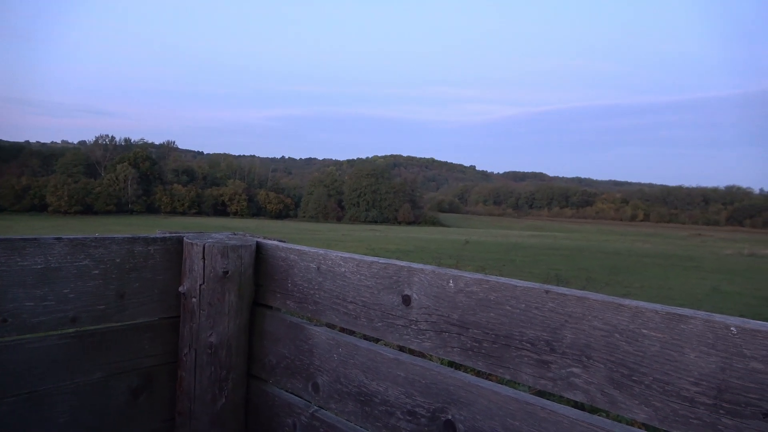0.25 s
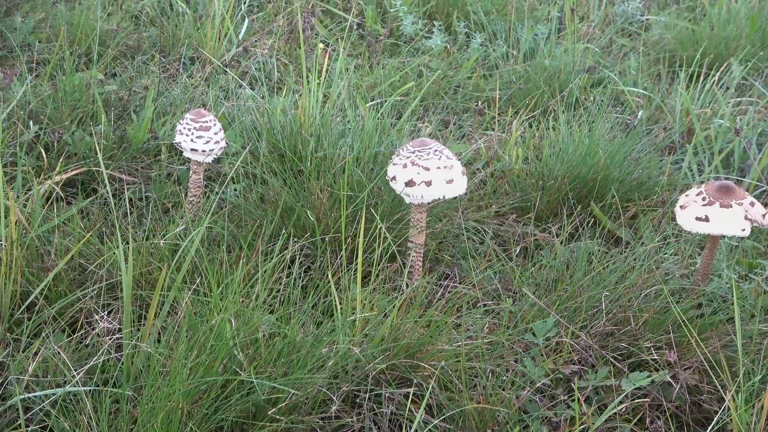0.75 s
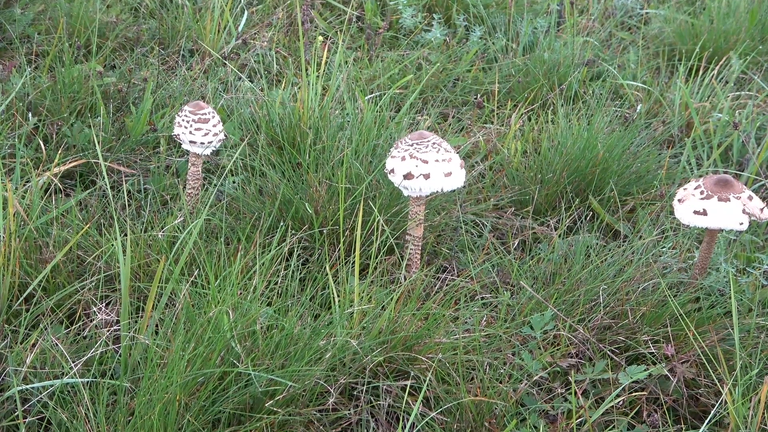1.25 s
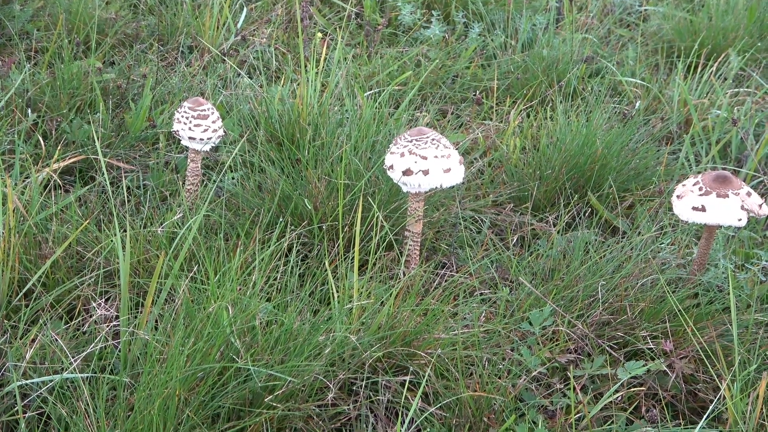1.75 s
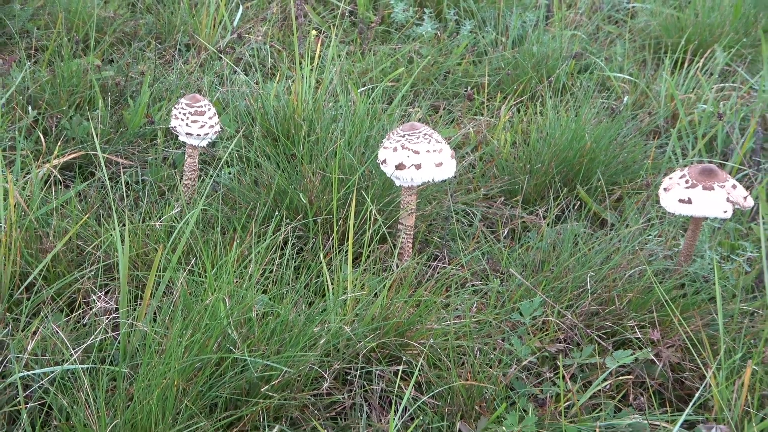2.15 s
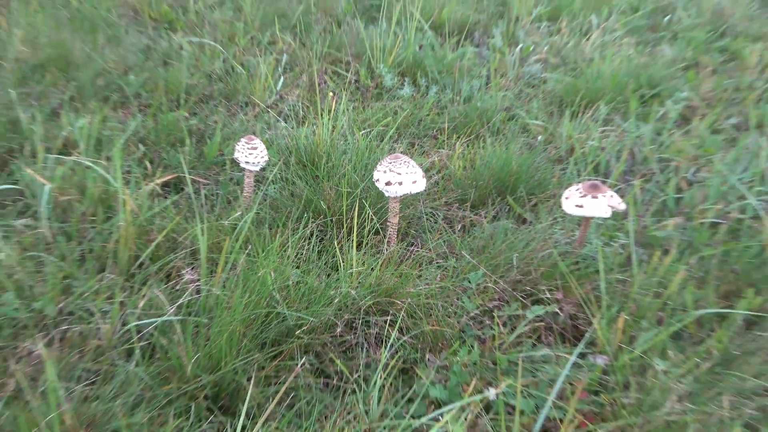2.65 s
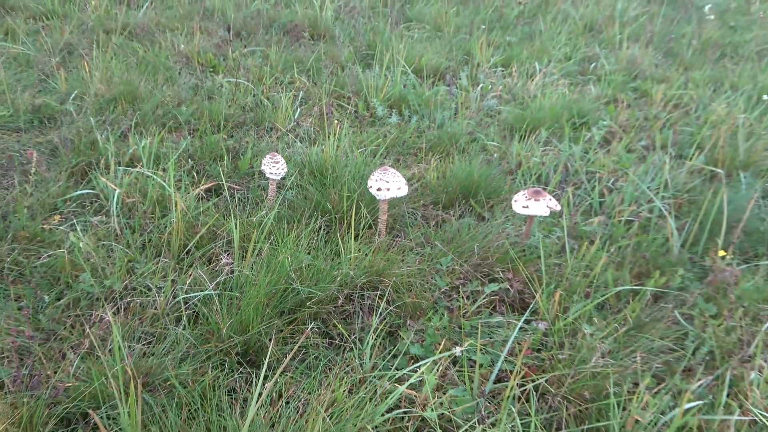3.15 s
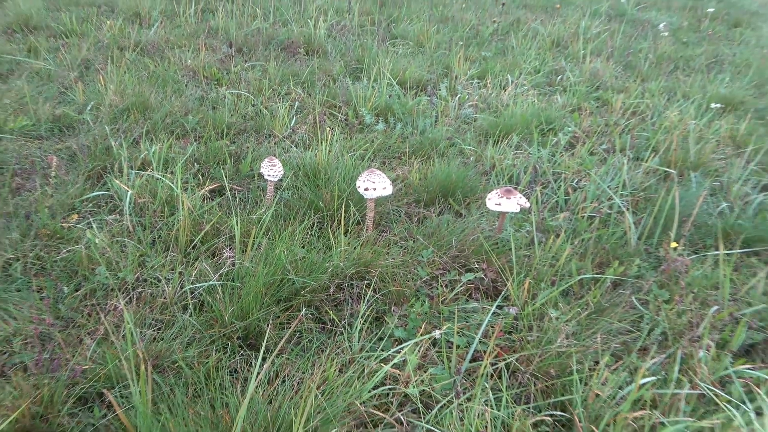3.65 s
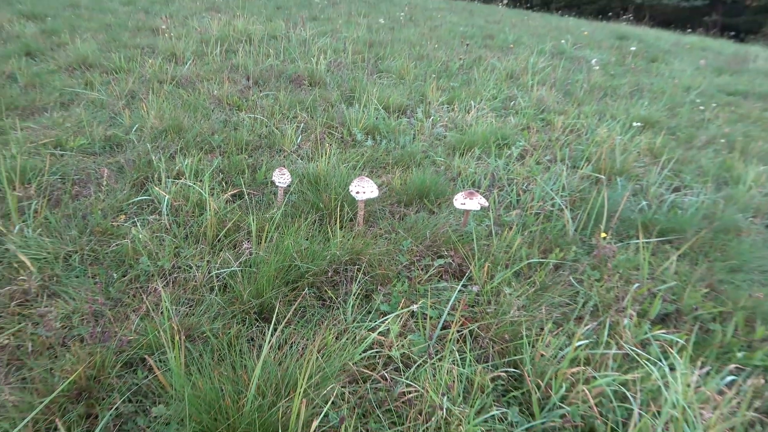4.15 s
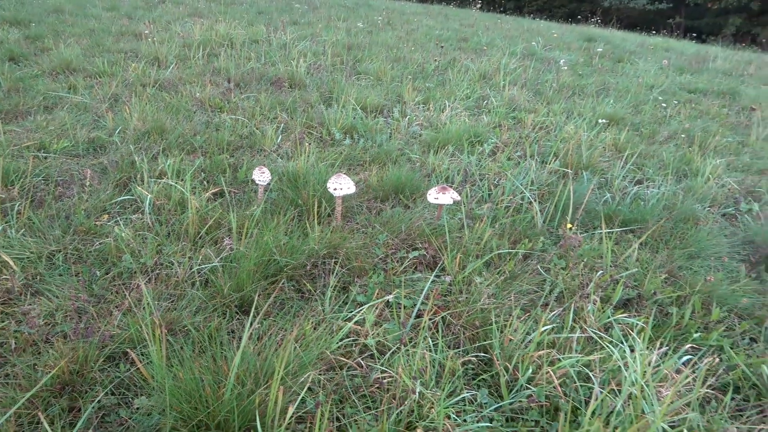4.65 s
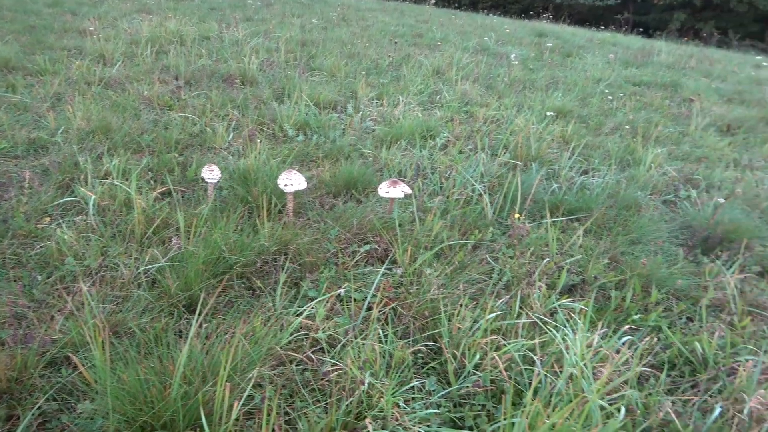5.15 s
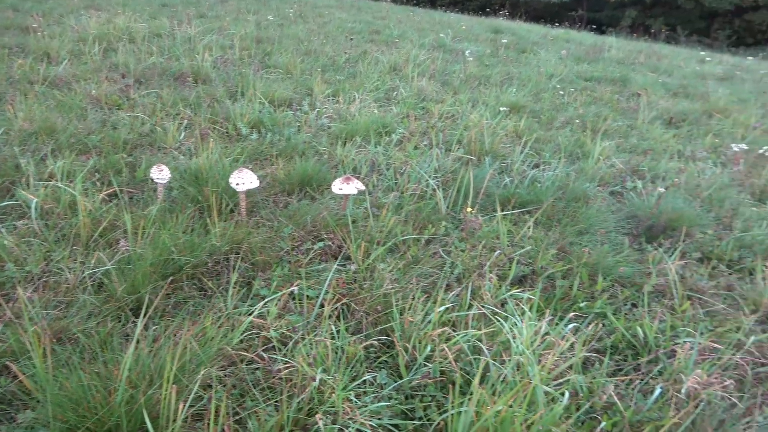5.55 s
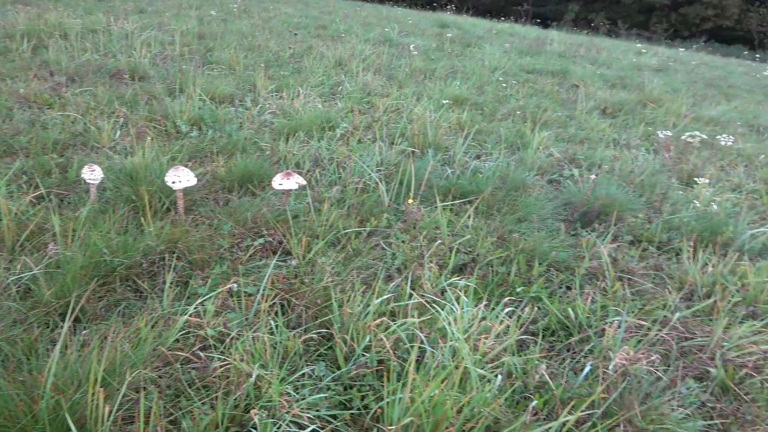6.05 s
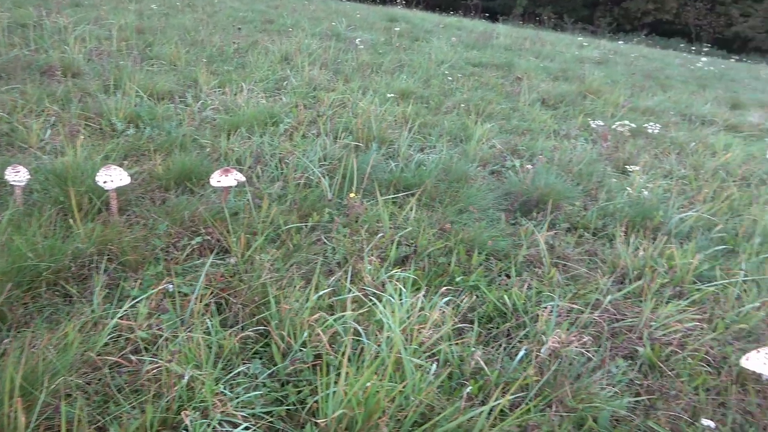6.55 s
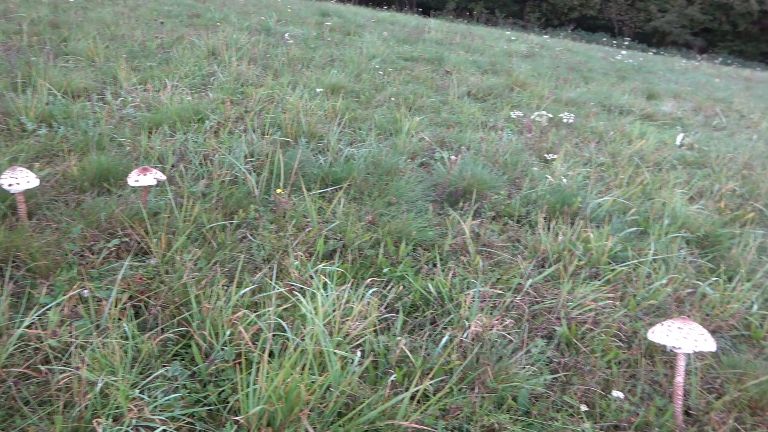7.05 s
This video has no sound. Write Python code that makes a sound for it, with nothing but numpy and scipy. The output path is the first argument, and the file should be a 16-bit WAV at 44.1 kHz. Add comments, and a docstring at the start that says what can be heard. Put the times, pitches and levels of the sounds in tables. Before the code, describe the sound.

Deep, burping, pulsed buck groans repeat about once a second, echoing softly off a wood edge above a quiet hissing grassland.

```python
"""A rutting buck's groans across a meadow: the end of one, then nine more. Fold pulses, roughly 18-36
a second, ring the resonances of a long throat; a thin hiss follows the open mouth.
The wood edge answers with a decaying noise tail; a low murmur, air hiss and a thin insect tone lie underneath.
One mix widened to stereo: the left channel is the right delayed, filtered and partly phase-scrambled."""
import sys
import numpy as np
from scipy import signal
from scipy.fft import rfft, irfft, next_fast_len
from scipy.io import wavfile
from scipy.ndimage import uniform_filter1d, map_coordinates

SR = 44100
rng = np.random.default_rng(int(sys.argv[2]) if len(sys.argv) > 2 else 0)


def to_wav(sig):
    """Store sig (one row per channel, or 1-D mono) as 16-bit WAV at the path in sys.argv[1].

    Samples outside -1..1 are clipped; the rate is SR.
    """
    pcm = np.clip(np.atleast_2d(sig), -1, 1) * 32767
    pcm = np.round(pcm).astype(np.int16)
    wavfile.write(sys.argv[1], SR, pcm.T)  # frames by channels


N = 321930

# vocal fold rhythm, one list a groan: time_s, pulses_since_groan_began
FOLD_RHYTHM = [
    [(-.03, 0), (.004, 1), (.075, 3)],
    [(.32, 0), (.402, 2), (.497, 5), (.66, 10), (.77, 13), (.865, 16)],
    [(1.182, 0), (1.325, 3), (1.371, 4), (1.502, 8), (1.537, 9), (1.71, 13)],
    [(2.172, 0), (2.227, 1), (2.323, 3), (2.451, 6), (2.496, 7), (2.65, 10)],
    [(3.032, 0), (3.135, 2), (3.221, 4), (3.282, 6), (3.346, 8), (3.414, 10), (3.487, 12), (3.641, 15)],
    [(4.047, 0), (4.271, 4), (4.423, 7), (4.504, 9), (4.572, 11), (4.682, 14), (4.725, 15), (4.78, 16),
     (4.9, 19)],
    [(5.045, 0), (5.09, 1), (5.191, 4), (5.328, 9), (5.412, 11)],
    [(5.705, 0), (5.737, 1), (5.795, 3), (5.828, 4), (5.964, 7), (6.017, 9), (6.17, 13)],
    [(6.23, 0), (6.356, 3), (6.421, 5), (6.515, 8), (6.602, 11), (6.775, 15)],
    [(6.952, 0), (7.045, 2), (7.12, 4), (7.227, 7), (7.32, 10)],
]
# drive of the three independent tract parts: time_s, chest_db, throat_db, mouth_db
GROAN_LEVELS = [(0, -39, -56, -53), (0.04, -60, -58.5, -71), (0.32, -43.5, -47.5, -60),
                (0.362, -41, -41, -46), (0.403, -42.5, -34.5, -42.5), (0.465, -41, -41, -37),
                (0.562, -43.5, -37.5, -35), (0.66, -45, -41.5, -37.5), (0.77, -43.5, -50, -49),
                (0.865, -51, -56.5, -59.5), (1.182, -54, -49, -64), (1.229, -45.5, -46, -47),
                (1.277, -45, -39, -40.5), (1.324, -41, -39, -43), (1.404, -35, -33.5, -37.5),
                (1.502, -39.5, -47.5, -38.5), (1.58, -46.5, -46, -47.5), (1.71, -46, -60.5, -77),
                (2.172, -57, -51.0, -55.5), (2.227, -44.0, -41, -54.5), (2.323, -42, -35, -41.5),
                (2.41, -35, -34, -43), (2.497, -48, -35, -43), (2.549, -37, -52, -49),
                (2.65, -54, -64, -66), (3.032, -48.5, -55.5, -65), (3.083, -48, -50.5, -46.5),
                (3.178, -40, -36.5, -36.5), (3.282, -37, -37, -39.5), (3.38, -39.5, -39, -35),
                (3.487, -43, -43.5, -42), (3.538, -49, -55, -60), (3.641, -55, -53, -57.5),
                (4.047, -44, -53.0, -72), (4.159, -40, -50, -59.5), (4.271, -49, -38, -61),
                (4.374, -55, -41, -58), (4.425, -44.5, -35.5, -45.5), (4.538, -36, -37, -38.5),
                (4.645, -43.5, -40, -42.5), (4.731, -43, -54.5, -46.5), (4.78, -40.0, -51.5, -54.5),
                (4.9, -48.5, -60, -69), (5.045, -49, -47.0, -60.5), (5.09, -41, -33.5, -45),
                (5.158, -41, -38.5, -37), (5.246, -38.5, -41.5, -35.5), (5.328, -42.5, -44.5, -47.0),
                (5.412, -65, -59, -61), (5.705, -54, -41.5, -51), (5.737, -34.5, -34, -39),
                (5.795, -35, -42, -32.5), (5.873, -37, -42.5, -36), (5.964, -37, -41.5, -45),
                (6.055, -42, -47.5, -54.5), (6.17, -57, -50.5, -56.5), (6.23, -57, -57, -70),
                (6.314, -49.5, -45.5, -53), (6.356, -37.5, -35, -44.5), (6.421, -39.5, -37, -33),
                (6.515, -33.5, -38, -32), (6.602, -38.5, -45, -39.5), (6.689, -44.5, -48.5, -47),
                (6.775, -52, -52, -60.5), (6.952, -47.5, -58, -63), (6.998, -50, -43.5, -46),
                (7.045, -39.5, -34, -42), (7.156, -32.5, -39.0, -34.5), (7.227, -43, -38.0, -35.0),
                (7.289, -40, -30.5, -35.5)]
# colour of each groan: turbulent_share (0-1, before each part's weight),
# then offsets from the usual voice: pharynx_db, nose_db, lips_db, rasp_db
GROAN_COLOUR = [(0.9, 1, 1.5, -0.5, -2), (0.86, 2, -2, 1.5, 1), (0.54, -0.5, -2, 0.5, -0.5),
                (0.4, 2, 0.5, 0.5, 1), (0.32, 1, -0.5, 0, -2), (0.44, -4.5, -2.5, 1, 4),
                (1, -2.5, -5.5, -0.5, 3.5), (0.9, 2, -3, -4, 1.5), (0.96, 1.5, -2.5, -2, -2),
                (1, 0.5, 2, 1, -1.5)]


def amp(db):
    """dB to gain."""
    return 10 ** (np.asarray(db) / 20)


def unit(x):
    """Scale to rms 1."""
    return x / np.sqrt(np.mean(x ** 2) + 1e-20)


def along(points, hz):
    """Interpolate (Hz, value) points on a log frequency axis."""
    f, v = np.transpose(points)
    return np.interp(np.log(hz + 1), np.log(f + 1), v)


def wobble(rate_hz):
    """Smooth random curve with rate_hz knots a second."""
    knots = rng.standard_normal(int(N * rate_hz / SR) + 4)
    return map_coordinates(knots, [np.arange(N) * rate_hz / SR])


def filtered(x, response):
    """Multiply the spectrum of x by a complex response of frequency."""
    m = next_fast_len(N + SR // 2)
    return irfft(rfft(x, m) * response(np.fft.rfftfreq(m, 1 / SR)), m)[..., :N]


def rush(spectrum, patchy_db):
    """Coloured noise of rms 1 with time-frequency patches of random gain."""
    z = signal.stft(rng.standard_normal(N), nperseg=512)[2]
    field = uniform_filter1d(rng.standard_normal(z.shape), size=6, axis=0)
    field = uniform_filter1d(field, size=12, axis=1)
    x = signal.istft(z * amp(patchy_db * unit(field)), nperseg=512)[1][:N]
    return unit(filtered(x, lambda hz: amp(along(spectrum, hz))))


def posture():
    """Times and levels of all tract parts: three move freely, the others follow them."""
    full_db = -40  # throat or mouth level of a full groan
    nose_lag_s = .035  # the nose opens and closes later than the mouth
    s, chest, throat, mouth = np.transpose(GROAN_LEVELS)
    groan_ends_s = [rows[-1][0] + .02 for rows in FOLD_RHYTHM]
    groan = np.searchsorted(groan_ends_s, s)
    _, pharynx_db, nose_db, lips_db, rasp_db = np.array(GROAN_COLOUR)[groan].T

    # level at a full groan, plus dB gained per dB of the leading part, plus the groan's colour
    late_mouth = np.interp(s - nose_lag_s, s, mouth)
    pharynx = -52.5 + .64 * (throat - full_db) + .32 * (mouth - full_db) + pharynx_db
    nose = -45 + .62 * (late_mouth - full_db) + nose_db
    lips = -44.5 + .85 * (mouth - full_db) + lips_db
    rasp = -61.5 + (mouth - full_db) + rasp_db
    return s, chest, throat, pharynx, nose, mouth, lips, rasp


def folds(snap_s, puff_s, breathy, leak, scatter_db):
    """Each fold closure gives a ragged snap, a dying puff of air and a steady leak."""
    source, last_closure_s = np.zeros(N), np.zeros(N)
    for rows, (turbulent, *_) in zip(FOLD_RHYTHM, GROAN_COLOUR):
        s, pulses = np.transpose(rows)
        beats = np.interp(np.arange(pulses[-1] + 1), pulses, s)
        beats = np.append(beats, 2 * beats[-1] - beats[-2])
        share = np.clip(turbulent * breathy, 0, 1)
        for a, b in zip(beats[:-1], beats[1:]):
            i, j = np.clip([round(a * SR), round(b * SR)], 0, N)
            t = np.arange(j - i) / SR
            air = unit(np.exp(-t / puff_s) + leak) * rng.standard_normal(j - i)
            snap = unit(np.exp(-t / snap_s) * rng.standard_normal(j - i))
            snap *= np.sign(snap[:1].sum())  # every closure pushes the same way
            pulse = np.sqrt(1 - share) * snap + np.sqrt(share) * air
            source[i:j] = amp(scatter_db * rng.standard_normal()) * pulse
            last_closure_s[i:j] = a
    return source, last_closure_s


def tract(modes, low_hz, high_hz):
    """Causal resonances between steep low and high edges, passing unit power of white noise."""
    def response(f):
        low = f * f / (f * f - low_hz ** 2 - .7j * f * low_hz + 1e-9)
        high = high_hz ** 2 / (high_hz ** 2 - f * f + 1j * f * high_hz)
        ringing = 0
        for k, (centre_hz, width_hz, db) in enumerate(modes):
            damping = 1j * f * width_hz
            ringing = ringing + (-1) ** k * amp(db) * damping / (centre_hz ** 2 - f * f + damping)
        h = (low * high) ** 2 * ringing
        return h / np.sqrt(np.mean(np.abs(h) ** 2))
    return response


def buck():
    """Fold pulses ring the tract parts, each at the level its posture sets at fold closure."""
    # tract resonances: centre_hz, width_hz, level_db (relative within a part)
    chest_modes = [(118.6, 31, -2.5), (143.8, 15.5, 6)]
    throat_modes = [(180, 17, -6), (222.9, 18.8, 6.5)]
    pharynx_modes = [(355, 19, -3.5), (528.5, 18, -4.5), (603.6, 4.8, 0.5), (831.6, 20, -5)]
    nose_modes = [(1039.3, 22, 4.5), (1120, 51, -6.5), (1255, 130, -8)]
    palate_modes = [(1728, 53, -1.1), (1897, 78, -0.95)]
    mouth_modes = [(2018, 40, 0.93), (2227, 61, 0.015)]
    lips_modes = [(2524, 107, -4.5), (2760, 85, 2.5), (2980, 238, -5), (3930, 155, -10)]
    rasp_modes = [(4200, 23, -3), (4772, 270, -1), (6070, 240, -14)]
    s, chest, throat, pharynx, nose, mouth, lips, rasp = posture()
    clean = 1 / (10 * SR)  # s; the low resonances feel one clean push
    # modes, level_db, low_hz, high_hz, snap_s, puff_s, air_weight, pulse_scatter_db
    parts = [(chest_modes, chest, 80, 200, clean, .03, .25, .7),
             (throat_modes, throat, 140, 265, clean, .02, .2, .7),
             (pharynx_modes, pharynx, 300, 900, clean, .02, .6, 1.5),
             (nose_modes, nose, 950, 1500, .002, .025, 1.2, 1.5),
             (palate_modes, mouth - .6, 1640, 2300, .004, .015, .9, 2.5),
             (mouth_modes, mouth - .4, 1900, 2600, .004, .015, .9, 2.5),
             (lips_modes, lips, 2400, 3600, .004, .012, .9, 2.5),
             (rasp_modes, rasp, 4200, 6000, .004, .01, .8, 3.5)]
    voice = np.zeros(N)
    for modes, level_db, low_hz, high_hz, snap_s, puff_s, breathy, scatter_db in parts:
        source, last_closure_s = folds(snap_s, puff_s, breathy, leak=.25, scatter_db=scatter_db)
        effort = amp(np.interp(last_closure_s, s, level_db))
        voice += filtered(source * effort, tract(modes, low_hz, high_hz))
    return voice


def wood_edge(x):
    """Trees scatter the call back as a noise tail; each frequency dies at its own speed."""
    # decay: freq_hz, t60_s
    decay = [(150, 0.37), (1000, 0.65), (2500, 0.31), (6000, 0.39)]
    hz, t, z = signal.stft(rng.standard_normal(SR), SR, nperseg=256)
    fade_db = -60 * t / along(decay, hz)[:, None]
    tail = signal.istft(z * amp(fade_db), SR, nperseg=256)[1]
    delayed = np.pad(x, (700, 0))  # samples
    return signal.fftconvolve(delayed, tail / np.linalg.norm(tail))[:N]


def breath():
    """A thin high hiss swells and fades with the open mouth, by half its dB."""
    # relative density: freq_hz, level_db_per_hz
    breath_spectrum = [(5000, -11), (6200, -11.5), (8300, -18.5), (10800, -8), (12600, -19), (13600, -47)]
    s, *_, mouth = np.transpose(GROAN_LEVELS)
    opening = uniform_filter1d(amp(np.interp(np.arange(N) / SR, s, mouth)), size=6000)
    return amp(-41) * np.sqrt(opening) * rush(breath_spectrum, patchy_db=-4.0)


def meadow():
    """A lumpy low murmur and open-air hiss, both shaped noise, and one faint wavering insect sine."""
    # murmur level: time_s, level_db
    murmur_level = [(0, -53), (.25, -48), (.95, -50), (1.15, -48.5), (1.9, -53), (2.1, -46), (2.75, -47.5),
                    (3, -46.5), (3.75, -46.5), (3.9, -50), (4.95, -49), (5.55, -46.5), (6.21, -49),
                    (6.88, -48), (7.3, -43)]
    # relative density: freq_hz, level_db_per_hz
    murmur_spectrum = [(40, -81), (70, -5.5), (95, -3.5), (122, 8.5), (160, 2.5), (235, -7.5), (290, -29),
                       (600, -98)]
    air_spectrum = [(22, 16), (30, 3.5), (300, 2.5), (850, 5.5), (1050, 2), (1380, -3), (1800, 2),
                    (2800, -4.5), (4300, -15), (8300, -21.5), (9700, -14), (10900, -6), (12600, -17.5),
                    (13600, -42)]
    # sine: freq_hz, peak_db (before its wobble)
    insect = (5400, -78)
    t = np.arange(N) / SR
    s, level_db = np.transpose(murmur_level)
    lumpy = unit(amp(1.06 * wobble(30)) * rush(murmur_spectrum, patchy_db=-0.5))
    murmur = amp(np.interp(t, s, level_db)) * lumpy
    air = amp(-51.0 + 0.067 * wobble(2.0)) * rush(air_spectrum, patchy_db=2.0)
    hz, peak_db = insect
    phase_rad = 2 * np.pi * hz * t + 1.4 * wobble(7.7)
    tone = amp(peak_db + 2.5 * wobble(3.9)) * np.sin(phase_rad)
    return murmur + air + tone


def left_channel(right):
    """The right signal delayed and filtered, part swapped for a phase-scrambled copy."""
    # balance, left minus right: freq_hz, level_db
    balance = [(100, .5), (220, 1.5), (330, -1), (700, -7.5), (1050, -11), (1900, -13), (2400, -7),
               (4000, -4), (4800, -1.5), (9300, 2), (10600, -4), (12300, -18.5), (13600, 2)]
    # phase lead of the left, negative is late: freq_hz, lead_rad
    lead = [(0, 0), (520, -2.3), (1500, -3.9), (2150, -5.1), (5340, -13.3), (8000, -19.3), (8400, -21),
            (11000, -28.2), (13500, -31.7), (16000, -32)]
    # coherence of left and right: freq_hz, likeness (0-1)
    alike = [(100, .995), (300, .97), (1000, .8), (1700, .82), (2300, .95), (4000, .8), (6000, .66),
             (10500, .84), (12500, .2)]
    z = signal.stft(right, nperseg=1024)[2]
    random_phase = np.exp(2j * np.pi * rng.random(z.shape))
    scrambled = unit(signal.istft(z * random_phase, nperseg=1024)[1][:N]) * np.std(right)

    def offset(hz):
        return amp(along(balance, hz)) * np.exp(1j * np.interp(hz, *np.transpose(lead)))

    left = filtered(right, lambda hz: offset(hz) * along(alike, hz))
    left += filtered(scrambled, lambda hz: offset(hz) * np.sqrt(1 - along(alike, hz) ** 2))
    return left


def scene():
    """Sum the sources in the right channel and derive a widened left channel from it."""
    call = buck()
    right = call + amp(-5.5) * wood_edge(call) + breath() + meadow()
    return np.array([left_channel(right), right])


def record(dry):
    """Each channel adds its own preamp hiss; nothing is kept from the band limit up."""
    # white hiss, rows left and right: level_db (before the band limit)
    preamp_hiss = [
        [-74],
        [-78],
    ]
    top_hz = 15720
    hiss = amp(preamp_hiss) * rng.standard_normal(dry.shape)
    return filtered(dry + hiss, lambda hz: hz < top_hz)


dry = scene()
out = record(dry)
to_wav(out)
```